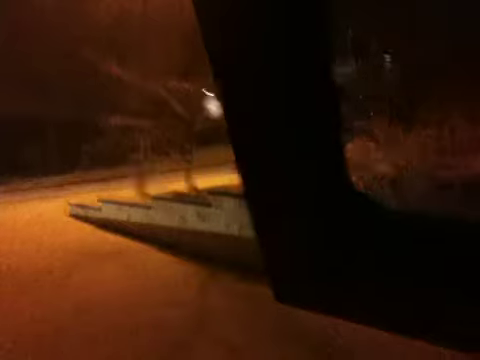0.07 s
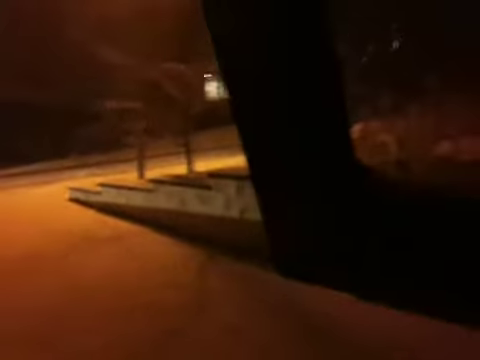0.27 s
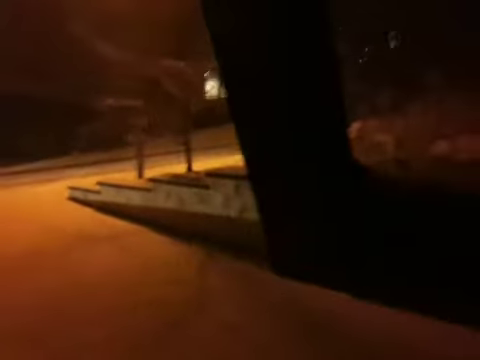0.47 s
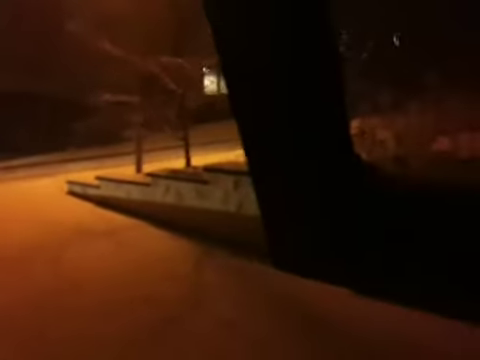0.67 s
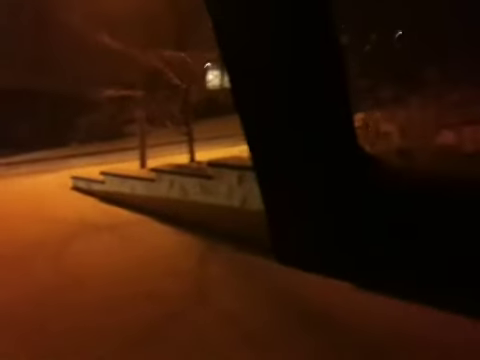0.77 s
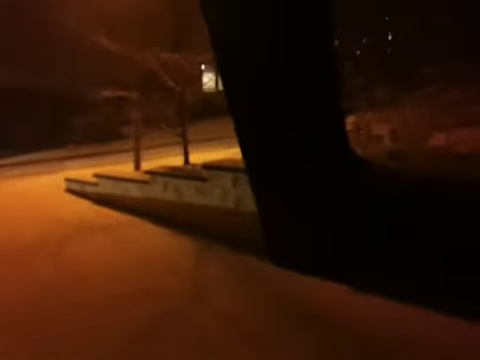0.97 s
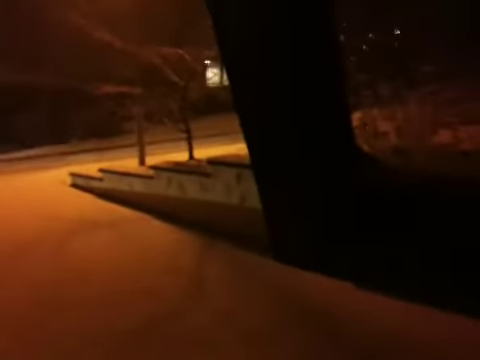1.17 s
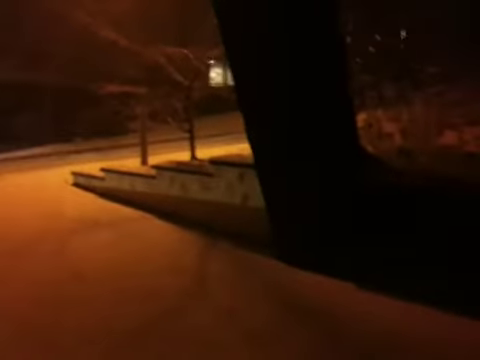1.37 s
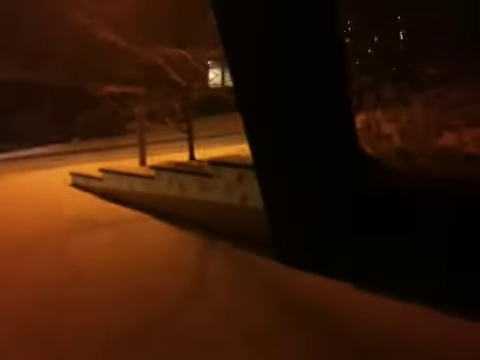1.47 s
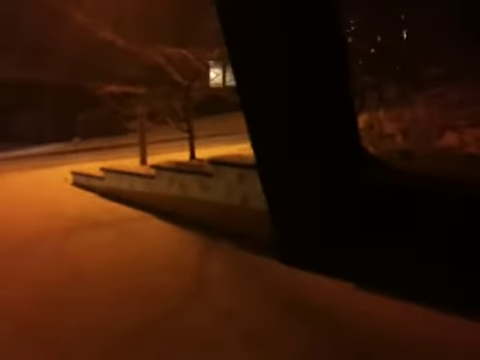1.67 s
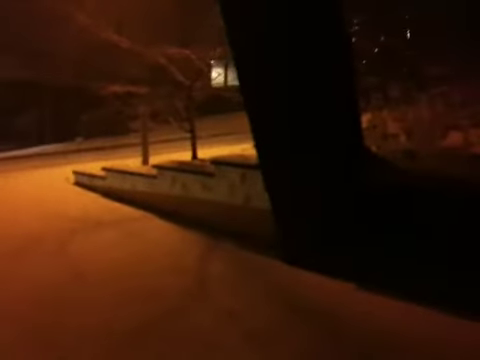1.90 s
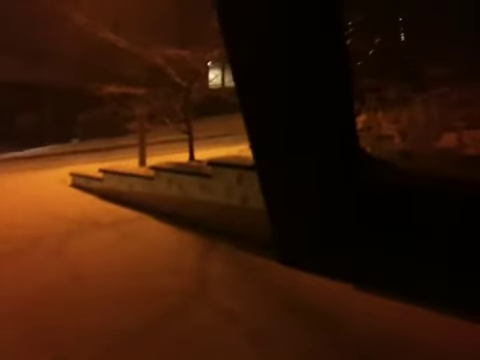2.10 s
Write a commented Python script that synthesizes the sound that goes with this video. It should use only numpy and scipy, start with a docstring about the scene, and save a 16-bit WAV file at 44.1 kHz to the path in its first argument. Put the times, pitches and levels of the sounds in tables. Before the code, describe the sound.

Wind buffeting a microphone in uneven dull thumps and sharp snaps, with faint snow ticks behind

```python
"""Dull thumps of wind over a lumpy rumble: a phone is held at an open window in a night blizzard.
Swarms of short pressure pulses make the thumps and the rumble, and sharp single pulses snap among them.
Dying spits of noise make the ticks, mostly blown snow on the glass, and one broad knock of a sharp eddy.
Bands of flickering noise make the faint hiss of the storm far behind."""
import sys
import numpy as np
from scipy import signal
from scipy.fft import rfft, irfft
from scipy.io import wavfile
from scipy.ndimage import uniform_filter1d

SR = 44100
rng = np.random.default_rng(int(sys.argv[2]) if len(sys.argv) > 2 else 0)


def attenuation_scalar(level_db):
    """Turn a level in dB into a linear amplitude multiplier (20 dB per decade)."""
    decades = np.asarray(level_db, float) / 20
    return 10 ** decades


def persist_wave(psi):
    """Save psi, clipped to +-1, as 16-bit WAV."""
    counts = np.round(np.clip(psi, -1, 1) * 32767).astype(np.int16)
    wavfile.write(sys.argv[1], SR, np.atleast_2d(counts).T)


N = 94462   # samples in the whole scene
PULSE_ROUNDNESS = 1.136   # for buffets and rumble; 1 = pointed pulses


def rms_one(x):
    """Scale to an average strength (rms) of 1."""
    return x / np.sqrt(np.mean(x ** 2) + 1e-20)


def in_time(rows):
    """Turn a table that starts with seconds into curves, one value per sample for each other column."""
    seconds, *columns = np.transpose(rows)
    return [np.interp(np.arange(N) / SR, seconds, column) for column in columns]


def drift(rate_hz):
    """Slow random wandering of rms 1: noise through a low-pass filter, with its first second dropped."""
    r = np.exp(-2 * np.pi * rate_hz / SR)
    wander = signal.lfilter([1], [1, -2 * r, r * r], rng.standard_normal(N + SR))
    return rms_one(wander[SR:])


def impulses(size):
    """Random eddies as single-sample pushes or pulls of uneven strength."""
    eddies_per_s, spread_db = 700, 3
    strength_db = spread_db * np.minimum(rng.exponential(1, size), 4)
    strength = attenuation_scalar(strength_db) * rng.choice([-1, 1], size)
    return strength * (rng.random(size) < eddies_per_s / SR)


def eddy_shape(x, width_ms, roundness):
    """Each impulse becomes a bell-shaped pressure pulse, seen through the microphone's bass cut."""
    port_cut_hz = 168.8
    hz = np.arange(len(x) // 2 + 1) * SR / len(x)
    high_pass = signal.butter(4, port_cut_hz, "high", fs=SR, output="sos")
    _, cut = signal.sosfreqz(high_pass, hz, fs=SR)
    bell = np.exp(-(2 * np.pi * hz * max(width_ms, .05) / 1000) ** roundness)
    return irfft(rfft(x) * bell * cut, len(x))


def hiss(level_db):
    """Far storm hiss: noise in half-octave bands, each flickering a little and partly together."""
    # Tone colour of the hiss. Each row: pitch in Hz, relative strength in dB per Hz.
    colour = np.array([(300, 2), (800, 6.5), (1200, 9), (1750, 8.5), (2500, 4.5), (4000, 3), (8000, 1),
                       (13000, -2), (16000, -1.5)])
    # The hiss under 2.4 kHz against the rest. Each row: time in seconds, boost in dB.
    low_hiss = [(.08, 5), (.3, 0), (.45, 3.5), (.62, 0.5), (.85, -3), (1.2, -2.5), (1.6, -2.5),
                (2.14, -1.5)]
    flicker_db, shared = 1.04, 0.14   # shared: part of the flicker common to all bands
    together = drift(25)
    low_db, = in_time(low_hiss)
    white = rng.standard_normal((2, N))   # neighbouring bands take turns, so they use different noise
    edges = 280 * 2 ** np.arange(0, 6.1, .5)
    out = 0
    for k, (low, high) in enumerate(zip(edges, edges[1:])):
        band_filter = signal.butter(2, [low, high], "band", fs=SR, output="sos")
        band = signal.sosfilt(band_filter, white[k % 2])
        db = np.interp(np.log(low * high) / 2, np.log(colour[:, 0]), colour[:, 1])
        db = db + low_db * (high < 2400)
        db = db + flicker_db * (shared * together + drift(40))
        out = out + attenuation_scalar(db) * band
    return attenuation_scalar(level_db) * rms_one(out)


def tick(level_db, hz, t60, broad_db):
    """A short strike: a crack and a dying spit of noise, coloured round a centre pitch."""
    octaves, crack_db, crack_t60_s = 1, 3.5, 0.014   # t60: time to fade by 60 dB
    noise = rng.standard_normal(6000)
    edges = hz * 2. ** (np.array([-.5, .5]) * octaves)
    band_filter = signal.butter(3, edges.clip(100, .45 * SR), "band", fs=SR, output="sos")
    band = rms_one(signal.sosfilt(band_filter, noise))
    broad = signal.sosfilt(signal.butter(4, 3800, "high", fs=SR, output="sos"), noise)
    t = np.arange(len(noise)) / SR
    crack = attenuation_scalar(crack_db - 60 * t / crack_t60_s)
    slow = attenuation_scalar(-60 * t / t60)
    return attenuation_scalar(level_db) * ((slow + crack) * band + attenuation_scalar(broad_db) * (.5 * slow + crack) * broad)


def ticks_and_sleet(hiss_db):
    """Clear ticks at set times, mostly snow grains on glass, and a thin random sleet of fainter ones."""
    # Clear ticks; the one at .9538 is a broad knock of a sharp eddy.
    # Each row: start in seconds, level in dB, centre pitch in Hz,
    # time to fade by 60 dB in seconds, broad treble in dB against the level.
    clear_ticks = [(0.0843, -64, 2090, 0.11, -16), (0.1438, -62, 5800, 0.037, 0),
                   (0.1767, -64.5, 10700, 0.024, 2), (0.2054, -63.5, 4870, .08, 0),
                   (0.3, -63, 8000, 0.076, 2.5), (.329, -66.5, 7000, 0.039, -8),
                   (0.541, -68, 5400, .06, -5), (0.55, -71, 6000, .08, -4), (0.6065, -79, 6000, 0.03, -5),
                   (0.638, -63.5, 4270, 0.024, -7), (0.659, -68, 6000, 0.3, 1),
                   (0.719, -64.5, 2470, 0.094, -6), (0.7928, -62.5, 6450, 0.036, -11),
                   (0.81, -66, 6020, 0.091, -11.5), (.9538, -51, 2190, 0.034, -14),
                   (1.195, -69.5, 5850, 0.073, 1), (1.235, -72, 11900, 0.11, -6),
                   (1.729, -53, 7100, 0.093, -1), (1.807, -73, 11500, .02, -13),
                   (1.818, -75, 3500, 0.045, -14)]
    sleet_count, sleet_per_s = 90, 46
    sleet_db, sleet_t60_s, sleet_broad_db = -11, 0.034, -17   # sleet_db: faintest grain against the hiss
    out = np.zeros(N + SR)
    for start_s, db, hz, t60, broad_db in clear_ticks:
        out[int(start_s * SR):][:6000] += tick(db, hz, t60, broad_db)
    for when, pitch, size in rng.random((sleet_count, 3)):
        i = int(when * sleet_count / sleet_per_s * SR)
        if i < N:
            db = hiss_db[i] + sleet_db + 9 * size
            hz = 2500 * 2 ** (2.2 * pitch)
            out[i:i + 6000] += tick(db, hz, sleet_t60_s, sleet_broad_db)
    return out[:N]


def rumble():
    """Small eddies pass all the time between the buffets; sharper ones come when the flow is fast."""
    # The rumble's course. Each row: time in seconds, level in dB, eddy pulse width in ms.
    gust = [(.08, -48, 1.3), (.21, -55.5, 1.3), (.3, -43, 1.1), (.35, -21, .9), (.4, -33, 1.1),
            (.47, -46.5, 1.2), (.52, -31.5, 1.1), (.62, -35, 1.1), (.7, -26.5, 1.1), (.85, -34.5, .8),
            (.93, -33.5, .7), (.99, -20, .6), (1.04, -38.5, 1.05), (1.15, -30, 1.05), (1.21, -45, 1.05),
            (1.3, -35, .6), (1.4, -40, .7), (1.5, -54, 1.05), (1.54, -35.5, .6), (1.58, -44, 1.1),
            (1.7, -51, 1.2), (1.77, -34, .7), (1.81, -64.5, 1.1), (1.92, -68.5, 1.2), (2.04, -47.5, 1.2),
            (2.08, -40, 1.3), (2.14, -45, 1.2)]
    width_scatter = .12   # rms of the random wandering of the log of the width
    db, width_ms = in_time(gust)
    width_ms = width_ms * np.exp(width_scatter * drift(40))
    train = impulses(N)
    # Every eddy takes the nearest of seven fixed widths.
    widths = np.geomspace(.4, 1.7, 7)
    nearest = np.abs(np.log(width_ms.clip(.1) / widths[:, None])).argmin(axis=0)
    out = 0
    for k, width in enumerate(widths):
        unit = np.sqrt(np.mean(eddy_shape(train, width, PULSE_ROUNDNESS) ** 2))
        chosen = train * attenuation_scalar(db) * (nearest == k)
        out = out + eddy_shape(chosen, width, PULSE_ROUNDNESS) / unit
    return out


def snaps():
    """Sharp single eddies: a narrow push-pull pulse of either sign, with a few weaker ones round it."""
    # Each row: time in seconds, approximate peak of the main pulse in dB, pulse width in ms.
    sharp_eddies = [(0.287, -35, 1), (0.314, -41, 0.52), (0.347, -31, 0.67), (0.358, -18, 0.79),
                    (0.383, -41, 0.72), (0.52, -29.5, 0.87), (0.582, -37.5, 0.56), (0.627, -31, 1),
                    (0.648, -15, 0.91), (0.678, -24.5, 1), (0.691, -38, 0.72), (0.758, -24.5, 0.9),
                    (0.807, -24.5, 0.87), (0.86, -20.5, 1), (0.882, -15, 0.99), (0.888, -16, 0.85),
                    (0.911, -31, 0.45), (0.921, -26, 0.87), (0.953, -18, 0.58), (0.959, -12.5, 0.69),
                    (0.968, -10, 0.68), (0.987, -22, 0.56), (1.116, -47, 0.78), (1.135, -32, 0.9),
                    (1.156, -14.5, 0.76), (1.161, -25, 0.53), (1.168, -26, 1), (1.292, -38, 0.95),
                    (1.313, -32, 1), (1.324, -25, 0.81), (1.343, -34, 1), (1.403, -29, 0.96),
                    (1.448, -30, 0.86), (1.462, -25, 1), (1.528, -39.5, 1), (1.538, -21.5, 0.84),
                    (1.742, -40.5, 0.97), (1.764, -35.5, 0.83), (1.775, -34, 0.77)]
    ragged_ms, ragged_db, lag_s = 5.0, -11, .001   # spread and level of the weaker pulses; delay of all
    size = 4096
    out = np.zeros(N + size)
    draws = rng.standard_normal((len(sharp_eddies), 9))
    for (time_s, db, width_ms), draw in zip(sharp_eddies, draws):
        train = signal.unit_impulse(size, "mid") * np.sign(draw[0])
        # The slope of a bell-shaped pulse is a push followed by a pull.
        peak = np.abs(np.gradient(eddy_shape(train, width_ms, 0.94))).max()
        offsets = ((draw[1:5] + .5) * ragged_ms * SR / 1000).astype(int)
        train[size // 2 + offsets] = attenuation_scalar(ragged_db) * draw[5:]
        push_pull = np.gradient(eddy_shape(train, width_ms, 1)) / peak
        out[int((time_s + lag_s) * SR) - size // 2:][:size] += attenuation_scalar(db) * push_pull
    return out[:N]


def buffets():
    """Each thump on the microphone port is a short swarm of eddies that swells and fades as one."""
    # Each row: centre in seconds, level in dB, length in ms (under 4 counts as 4), eddy pulse width in ms.
    thumps = [(0.106, -33.5, 9.5, 2.1), (0.155, -30, 0, 3.6), (0.18, -27, 10, 1.37), (0.241, -43, 2, 2.3),
              (0.263, -32, 5.5, 2.5), (0.295, -23, 6.5, 1.5), (0.319, -21, 8, 1.3), (0.362, -12, 8, 0.84),
              (0.414, -39.5, 31, 1.3), (0.449, -27, 5.5, 2.9), (0.523, -28.5, 26, 1.01),
              (0.587, -22.5, 18.5, 1.14), (0.648, -23, 15.5, 0.62), (0.71, -26, 23, 0.95),
              (0.734, -41, 15, 1.2), (0.755, -24, 9.5, 1.12), (0.782, -26.5, 3, 0.68),
              (0.824, -18, 16.5, 0.95), (0.889, -23, 32, 0.76), (0.91, -13.5, 9.5, 0.6),
              (0.961, -10, 7.5, 0.47), (0.98, -16.5, 1.5, 1.43), (1.026, -28, 13.5, 0.99),
              (1.065, -31, 17.5, 1.2), (1.096, -37, 1.5, 2), (1.117, -40, 2, 0.63),
              (1.162, -17.5, 11.5, 0.94), (1.19, -21, 8, 1.25), (1.229, -22, 6.5, 0.92),
              (1.247, -33, -5, 2.1), (1.273, -29, 11, 0.67), (1.321, -30, 1, 1.2), (1.382, -24.5, 2.5, 0.8),
              (1.409, -25, 4.5, 0.94), (1.45, -24, 10, 0.85), (1.464, -21, 0, 0.61),
              (1.497, -34.5, 2.5, 0.97), (1.551, -24.5, 14, 1.28), (1.595, -63, 9, 1.7),
              (1.62, -34.5, 10, 2.6), (1.648, -27.5, 14, 1.45), (1.678, -38.5, 11.5, 0.81),
              (1.7, -30, 7.5, 1.7), (1.746, -32, 6.5, 0.65), (1.778, -27, 5, 0.72), (1.814, -46.5, 10, 2.4),
              (1.833, -55, -10.5, 1.2), (1.877, -47, 11.5, 2.7), (1.903, -62.5, 4, 0.67),
              (1.952, -47.5, 13, 2.2), (2.012, -35, 1, 1.25), (2.053, -29, 4, 1.2), (2.082, -34, 15, 1.04)]
    evening = 0.81   # share of the chance swell taken out of a buffet
    soften_hz_ms, deep_cut_hz = 700, 83   # smooth above soften_hz_ms divided by the pulse width
    size = 4096
    out = np.zeros(N + size)
    ms = (np.arange(size) - size // 2) * 1000 / SR
    hz = np.arange(size // 2 + 1) * SR / size
    for centre_s, db, length_ms, width_ms in thumps:
        swarm = rms_one(eddy_shape(impulses(size), width_ms, PULSE_ROUNDNESS))
        # Even out the chance swell, then give the swarm one rise and fall.
        swell = np.abs(signal.hilbert(swarm))
        swell = uniform_filter1d(uniform_filter1d(swell, size=130), size=130) + .1
        swarm = rms_one(swarm / swell ** evening)
        swarm = swarm * np.exp(-2 * (ms / max(length_ms, 4)) ** 2)
        treble_cut = 1 / (1 + (hz * width_ms / soften_hz_ms) ** 4)
        bass_cut = hz ** 4 / (hz ** 4 + deep_cut_hz ** 4)
        thump = irfft(rfft(swarm) * treble_cut * bass_cut, size)
        out[int(centre_s * SR) - size // 2:][:size] += attenuation_scalar(db) * thump
    return out[:N]


def scene():
    """Hiss, ticks and wind on the port add up in one channel."""
    # Loudness of the far hiss. Each row: time in seconds, level in dB.
    hiss_level = [(.1, -68.5), (.31, -63), (.42, -67), (.55, -66), (.68, -65.5), (.9, -66), (1.1, -70),
                  (1.22, -67.5), (1.4, -70.5), (1.7, -72), (2.14, -72)]
    hiss_db, = in_time(hiss_level)
    wind = rumble() + snaps() + buffets()
    return (hiss(hiss_db) + ticks_and_sleet(hiss_db) + wind)[None]


def low_pass(x):
    """Removes everything above the highest recorded frequency."""
    return signal.sosfilt(signal.butter(12, 16360, fs=SR, output="sos"), x)


def record(dry):
    """The capsule's soft overload rounds the largest peaks, the top is cut, and the start is silent."""
    ceiling, top_hz, start_s = 0.75, 16500, .0835   # ceiling: 1 = full scale
    rounded = ceiling * np.tanh(dry / ceiling)
    top_cut = signal.cheby2(10, 50, top_hz, fs=SR, output="sos")
    mix = signal.sosfilt(top_cut, rounded) * (np.arange(N) >= start_s * SR)
    return low_pass(mix)


dry = scene()
out = record(dry)
persist_wave(out)
```